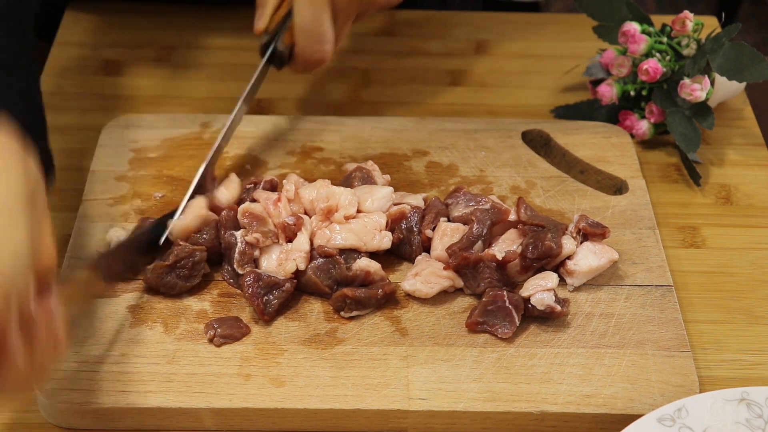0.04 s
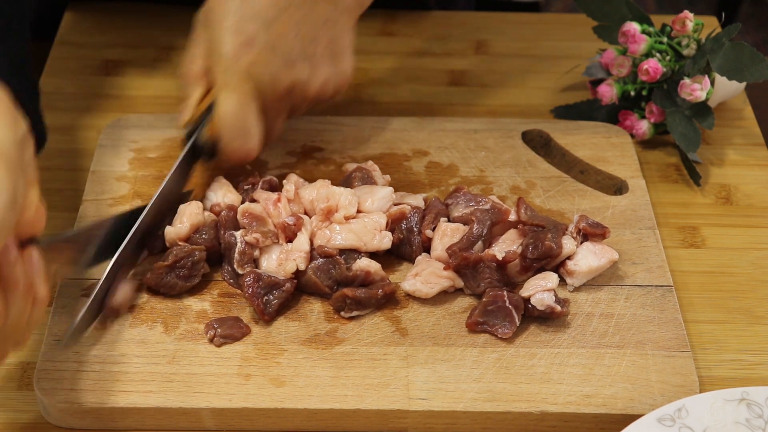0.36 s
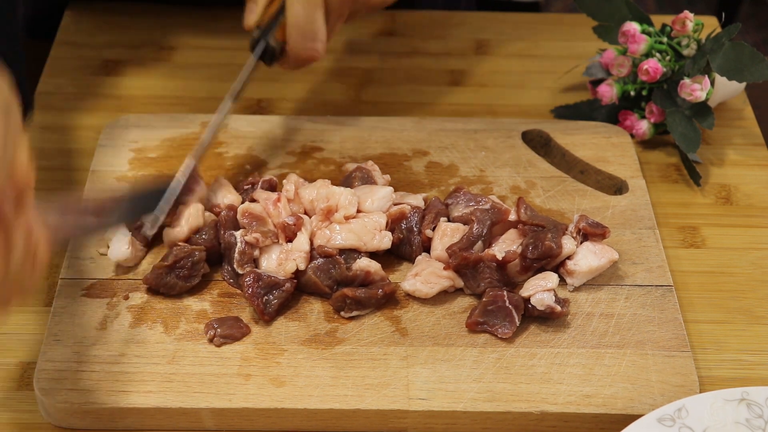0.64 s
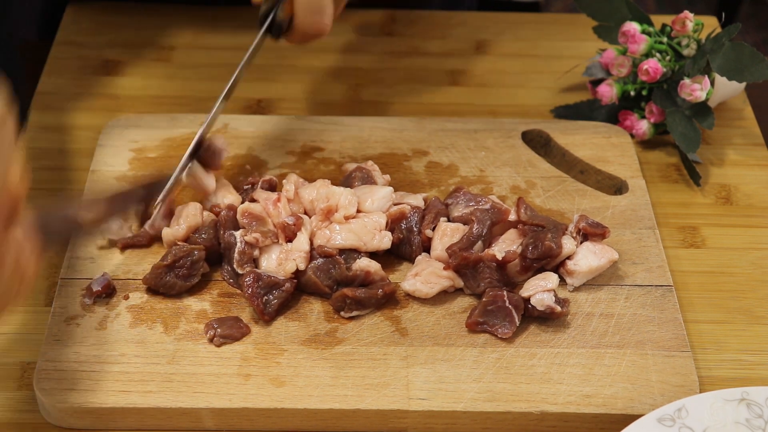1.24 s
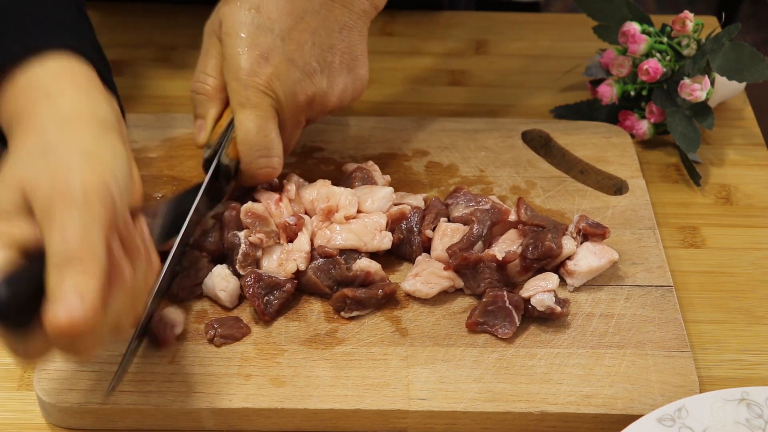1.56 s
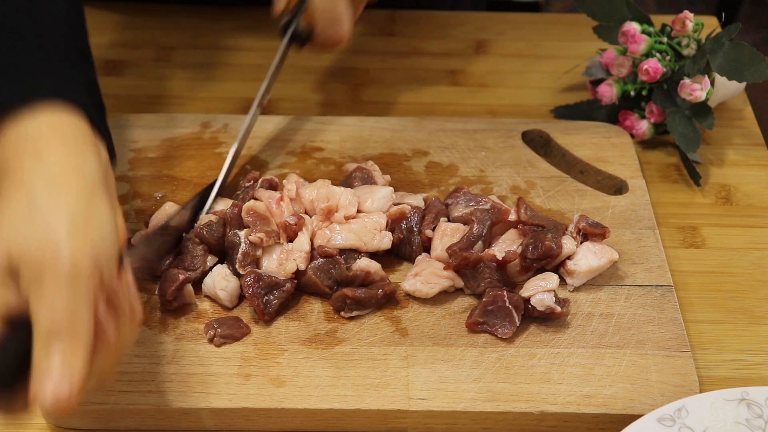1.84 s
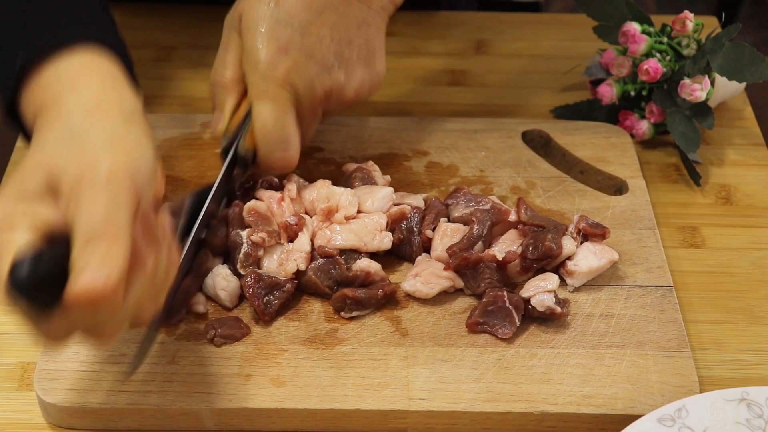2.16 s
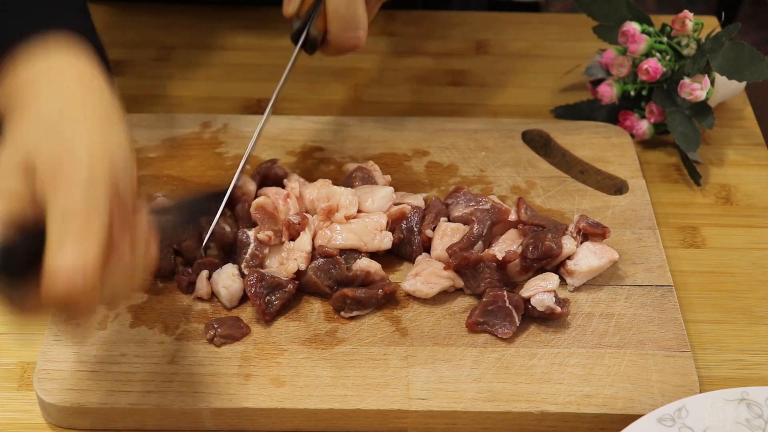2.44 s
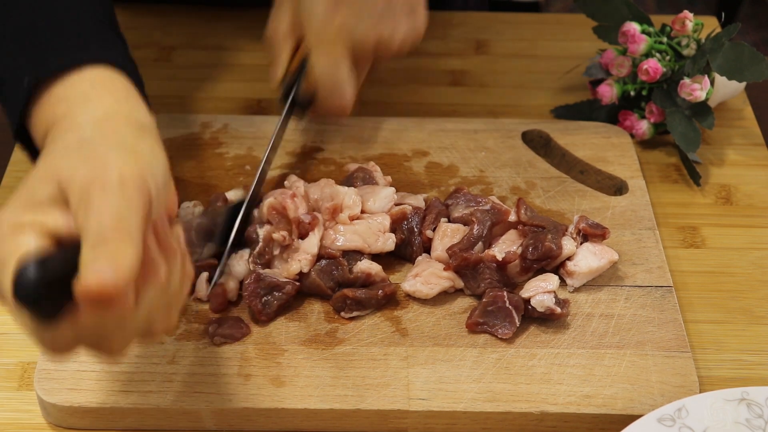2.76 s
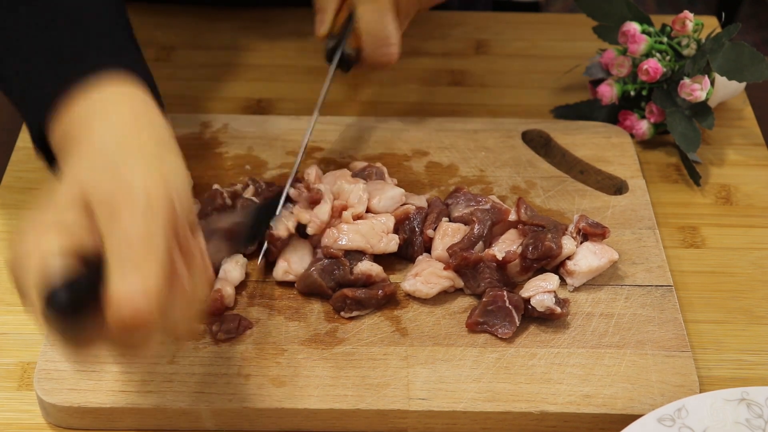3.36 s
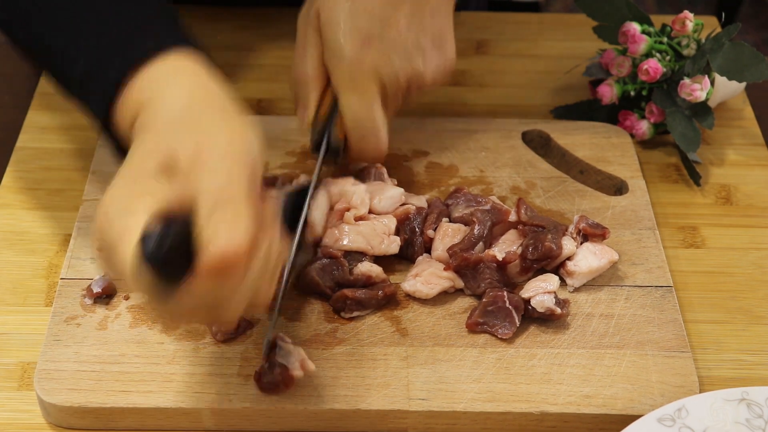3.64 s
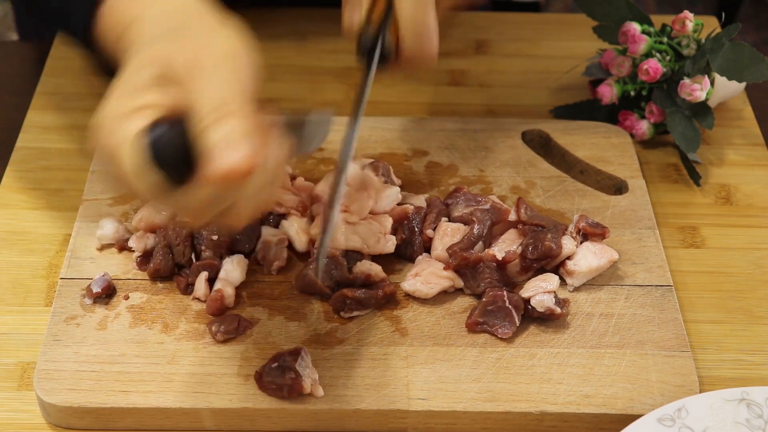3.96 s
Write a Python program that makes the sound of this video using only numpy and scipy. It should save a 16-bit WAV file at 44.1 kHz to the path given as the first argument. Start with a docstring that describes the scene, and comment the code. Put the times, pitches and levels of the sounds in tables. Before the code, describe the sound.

Knife blades scrape against each other as they slice meat, clinking and knocking on a wooden board in a steady rhythm with faint wet crackles. The last four strokes hit louder, heard up close over low kitchen room noise.

```python
"""Steel scrapes on steel over a drag on wood: two crossed knives cut meat, about twice a second.
In each stroke the blades clink together, knock on the board, then drag over it while friction between
them hisses and sings, rising in pitch. The wet meat crackles and ticks now and then. The last four
strokes land hard and overload the microphone. A small kitchen adds reverberation and steady noise."""
import sys
import numpy as np
from scipy import signal
from scipy.fft import rfft, irfft
from scipy.io import wavfile

SR = 44100
rng = np.random.default_rng(int(sys.argv[2]) if len(sys.argv) > 2 else 0)


def store_pcm(level_fs):
    """Save levels as 16-bit WAV."""
    pcm = np.round(np.clip(level_fs, -1, 1) * 32767).astype(np.int16)
    wavfile.write(sys.argv[1], SR, np.atleast_2d(pcm).T)


N = 176400
T = np.arange(N) / SR
RING_T = T[:SR // 4]
LEFT_RIGHT = np.array([[1], [-1]])
TOP_HZ = 15900

# cutting strokes (time [s], length [s], drag [dB], scrape [dB], hiss [dB], singing [dB])
CUT_STROKES = [(-.12, 0.19, -27, -29, -33.5, -32), (0.428, 0.19, -28.5, -28.5, -43.5, -29.5),
               (1.066, 0.17, -28, -25.5, -44, -28), (1.712, 0.2, -33, -29, -29.5, -30.5),
               (2.248, .17, -26, -30, -33, -31), (2.742, .175, -24.5, -29, -33, -29.5),
               (3.24, .17, -23.5, -30.5, -36.5, -30.5), (3.718, 0.15, -23.5, -27, -34, -38.5)]
# edge dragging on wood (frequency [Hz], level [dB], t60 [s])
DRAG_MODES = [(143, -27, 0.1), (254.6, -16.5, 0.057), (442.3, -4, 0.042), (540, -8.5, 0.022),
              (631, -7.5, 0.044), (825, 0, 0.038), (1044, -6, 0.042), (1367, -4.5, 0.021),
              (1744, -4.5, 0.024), (1970, -7, 0.016), (2240, -8.5, 0.075)]
# steel-on-steel scrape (frequency [Hz], level [dB])
SCRAPE_SPECTRUM = [(200, -23), (900, -3.5), (1250, -10), (1700, 0), (2500, -2), (3400, -1.5), (4000, -8.5),
                   (5500, -13), (8000, -19.5), (16000, -29)]
# sliding hiss (frequency [Hz], level [dB])
HISS_SPECTRUM = [(1000, -27), (3000, -20), (4000, 3), (6000, 3), (8300, 0.5), (10000, -4.5), (12500, -8),
                 (16000, -13)]
# steel resonances (frequency at stroke start [Hz], width [Hz], level [dB])
SING_BANDS = [(1555, 220, -5.5), (2214, 147, 2.5), (3015, 190, -7)]
# room noise (frequency [Hz], level [dB])
AIR_SPECTRUM = [(15, -49), (25, -16.5), (190, -0.5), (256, -2.5), (335, -1), (476, -2.5), (560, -3),
                (695, -5), (796, -4), (1520, -7), (1650, -9), (6560, -20), (16000, -32.5)]
# kitchen reverberation (frequency [Hz], t60 [s], level [dB])
REVERB_BANDS = [(149, 0.45, -25.5), (470, 0.4, -4), (1000, 0.62, -6), (2210, 0.47, -6.5),
                (5050, 0.72, -11.5), (12100, 0.15, -3.5)]
# blades meeting or parting (time [s], tick [dB], slide [dB], high-pass [Hz], rise [s])
BLADE_CONTACTS = [(0.161, -23, -39.5, 2840, 0.0079), (0.3268, -19, -26, 1370, 0.00056),
                  (0.339, -16, -60, 3500, 0.0018), (.737, -34, -57, 2500, 0.0051),
                  (0.8863, -23, -33, 1380, .0005), (1.5598, -19, -32.5, 1290, 0.00043),
                  (2.176, -19.5, -30.5, 1402, 0.0006), (2.7294, -18, -58, 1795, 0.00022),
                  (3.024, -21.5, -37, 3520, 0.0084), (3.2087, -13, -42, 1760, 0.00055),
                  (3.6619, -13.5, -35, 1800, 0.00043)]
# steel contact noise (frequency [Hz], level [dB])
CONTACT_SPECTRUM = [(500, -52), (1500, 9.5), (3500, -3.5), (7500, -0.5), (8600, -1.5), (10600, -1.5),
                    (13000, -9), (16000, -7)]
# blade ringing (frequency [Hz], level [dB], t60 [s])
BLADE_MODES = [(1522, 3, 0.035), (2270, 1, 0.15), (2920, -3, 0.094), (3417, 3, 0.074), (4550, 2, 0.062),
               (4980, -3, 0.12), (5740, 1, 0.036), (6260, -2, 0.12), (7660, 2, 0.065), (9360, -3.5, 0.058),
               (11500, -13, 0.043), (12210, -15, 0.044), (13600, -27, 0.037), (15140, -26, 0.039)]
# edge hitting the board (time [s], level [dB], low-pass [Hz], pitch of the spot struck [ratio])
BOARD_HITS = [(0.4068, -7.5, 1050, 0.99), (.4445, -3.5, 644, 0.77), (1.0292, -5.5, 650, 1.096),
              (1.0750, -8.5, 589.5, 0.9), (1.714, -21, 706, 0.78), (2.239, -1, 4830, 1.007),
              (2.7324, -2.5, 1870, 1.19), (2.7334, 5.5, 2140, 1.004), (3.2335, -21, 1845, 0.98),
              (3.2356, 4.5, 2450, 1), (3.7003, 1, 4000, 1.08), (3.7095, -6.5, 1690, 0.87)]
# board ringing (frequency [Hz], level [dB], t60 [s])
BOARD_MODES = [(166, -30, 0.037), (272, -20.5, 0.07), (496, -13, .04), (611, -12.5, 0.014),
               (807, -1.5, 0.035), (879, 3.5, 0.02), (1049, 2.5, 0.016), (1315, -5.5, 0.026),
               (1720, 4, 0.017), (2066, 5.5, 0.013), (2370, -4.5, 0.018), (3395, -1.5, 0.023),
               (3860, -14.5, 0.012), (5300, -30, 0.0048)]
# wet ticks of the meat (time [s], level [dB], frequency [Hz])
MEAT_TICKS = [(1.681, -21, 3400), (3.274, -37, 9500), (3.2953, -9, 9560), (3.502, -25, 7407),
              (3.976, -28, 6810)]


def amp(db):
    """Decibels to gain."""
    return 10 ** (np.asarray(db) / 20)


def unit(x):
    """Scale to rms 1."""
    return x / np.sqrt(np.mean(x ** 2))


def noise(shape=N):
    """White noise."""
    return rng.standard_normal(shape)


def add(out, start_s, x):
    """Mix x in at a time."""
    i = int(start_s * SR)
    out[i:i + len(x)] += x[:N - i]


def colour(x, spectrum):
    """Shape noise to a spectrum, at rms 1."""
    size = x.shape[-1]
    hz, db = np.array(spectrum, float).T
    bin_db = np.interp(np.log(np.fft.rfftfreq(size, 1 / SR) + 1), np.log(hz), db)
    return unit(irfft(rfft(x) * amp(bin_db), size))


def filt(x, hz, kind, order=2):
    """Low-, high- or band-pass."""
    edges_hz = np.clip(hz, 10, SR / 2 - 100)
    return signal.sosfilt(signal.butter(order, edges_hz, kind, fs=SR, output="sos"), x)


def ring(modes, pitch=1, detune=0):
    """Decaying modes of alternating sign, optionally detuned at random."""
    out = 0
    for k, (hz, db, t60_s) in enumerate(modes):
        tuned_hz = hz * pitch * (1 + detune * rng.standard_normal())
        out += (-1) ** k * amp(db - 60 * RING_T / t60_s) * np.sin(2 * np.pi * tuned_hz * RING_T)
    return out


def drive(force, response):
    """Pass a force through a body's unit-energy response."""
    return signal.fftconvolve(force, response / np.linalg.norm(response))[:len(force)]


def press(age_s, length_s, attack_s, release_s):
    """Linear attack, hold, exponential release."""
    return np.clip(age_s / attack_s, 0, 1) * np.exp(-np.maximum(age_s - length_s, 0) / release_s)


def friction(slips_per_s=5000, judder_db=1, judder_hz=40):
    """Dense tiny slips of uneven size under a juddering hand."""
    slips = (rng.random(N) < slips_per_s / SR) * noise()
    judder = unit(filt(noise(), judder_hz, "low"))
    return unit(slips * amp(judder_db * judder))


def strokes(attack_s=0.0049, release_s=0.032, sag_db_per_s=37, pitch_rise_per_s=1.25):
    """Edges drag over wood while the blades scrape along each other, hissing most at full speed."""
    drag_env, scrape_env, hiss_env, sing_env = np.zeros((4, N))
    pitch = np.ones(N)
    for start_s, length_s, drag_db, scrape_db, hiss_db, sing_db in CUT_STROKES:
        age_s = np.clip(T - start_s, 0, 1)
        speed = 1 / (1 + ((age_s / length_s - 0.69) / 0.31) ** 2)  # peaks 69% through the stroke
        drag_env += amp(drag_db - sag_db_per_s * age_s) * press(age_s, length_s, attack_s, 0.041)
        scrape_env += amp(scrape_db) * press(age_s, length_s, 0.078, release_s)
        hiss_env += amp(hiss_db) * press(age_s, length_s, attack_s, release_s) * speed
        sing_env += amp(sing_db) * press(age_s, length_s, 0.18, release_s)
        pitch = np.where(age_s > 0, 1 + pitch_rise_per_s * np.minimum(age_s, length_s), pitch)
    drag = drive(drag_env * friction(), ring(DRAG_MODES))
    scrape = scrape_env * colour(friction(), SCRAPE_SPECTRUM)
    wet_hiss = hiss_env * (colour(friction(), HISS_SPECTRUM) + crackle())
    return drag + scrape + wet_hiss + sing_env * singing(pitch)


def crackle(grains_per_s=500, scatter_db=6):
    """Wet fibres part under the edge in sparse, uneven grains."""
    grains = (rng.random(N) < grains_per_s / SR) * rng.choice([-1, 1], N)
    sizes = amp(scatter_db * np.minimum(rng.exponential(size=N), 3))
    return amp(-16.5) * unit(filt(grains * sizes, [2000, 6000], "band"))


def singing(pitch, wander_share=0.022, wander_hz=18):
    """Friction shakes narrow steel resonances; they glide as the crossing point runs along the blades."""
    out = 0
    for hz, width_hz, db in SING_BANDS:
        wander = 1 + wander_share * unit(filt(noise(), wander_hz, "low"))
        phase = 2 * np.pi * np.cumsum(hz * pitch * wander) / SR
        in_phase, quadrature = (unit(filt(friction(), width_hz / 2, "low")) for _ in range(2))
        out += amp(db) * (in_phase * np.cos(phase) + quadrature * np.sin(phase))
    return unit(out)


def air(mid_db=-46):
    """Steady room noise, more alike left and right in the bass."""
    mid, side = colour(noise((2, N)), AIR_SPECTRUM)
    side = 0.32 * side + 0.65 * filt(side, 1500, "high", order=1)
    return amp(mid_db) * (mid + side * LEFT_RIGHT)


def kitchen(x, delay_s=0.0048, apart_hz=730):
    """Diffuse reflections decaying by octave band; left and right differ above apart_hz."""
    age_s = T[:SR]
    hz, t60s, levels = np.array(REVERB_BANDS).T
    response = 0
    for centre_hz in 125 * 2. ** np.arange(8):
        t60_s, db = (np.interp(np.log(centre_hz), np.log(hz), column) for column in (t60s, levels))
        mid, side = filt(noise((2, SR)), [centre_hz / np.sqrt(2), centre_hz * np.sqrt(2)], "band", 3)
        width = centre_hz / np.hypot(centre_hz, apart_hz)
        band = (mid + width * side * LEFT_RIGHT) / np.hypot(1, width)
        fade = (age_s > delay_s) * amp(-60 * age_s / t60_s)
        response += amp(db) * band * fade / np.linalg.norm(fade)
    return signal.fftconvolve(x[None], response, axes=1)[:, :N]


def clinks(ring_db=-3, rub_db=-6.5):
    """Steel chatters on steel for a moment, then slides lightly; both blades ring."""
    out, age_s = np.zeros(N), T[:SR // 2]
    for start_s, tick_db, slide_db, low_hz, rise_s in BLADE_CONTACTS:
        tick_env = amp(tick_db) * press(age_s, rise_s, rise_s, release_s=0.0038)
        slide_env = amp(slide_db) * press(age_s, rise_s, rise_s, release_s=0.08)
        tick = tick_env * colour(noise(len(age_s)), CONTACT_SPECTRUM)
        slide = slide_env * noise(len(age_s))
        rub = amp(rub_db) * slide_env * colour(noise(len(age_s)), CONTACT_SPECTRUM)
        blades = sum(ring(BLADE_MODES, detune=0.0218) for _ in range(8))
        ringing = amp(ring_db) * drive(tick / 2 + slide, blades)
        add(out, start_s, filt(tick + ringing + rub, low_hz, "high", order=3))
    return out


def knocks(crack_s=0.0019, thump_s=0.011):
    """The edge hits the board; meat under it softens the blow."""
    out = np.zeros(N)
    thump = amp(-43.5) * np.exp(-RING_T / thump_s)
    for start_s, db, bright_hz, pitch in BOARD_HITS:
        burst = filt(noise(len(RING_T)), [600, 6000], "band", order=1)
        crack = amp(5.5) * burst * np.exp(-RING_T / crack_s)
        wood = filt(ring(BOARD_MODES, pitch) / 2 + crack, 258, "high", order=1)  # bass radiates poorly
        add(out, start_s, amp(db) * filt(wood + thump, bright_hz, "low"))
    return out


def squelches(decay_s=0.0008):
    """Tiny wet snaps as meat lets go of the steel."""
    out = np.zeros(N)
    for start_s, db, hz in MEAT_TICKS:
        burst = unit(filt(noise(len(RING_T)), [hz / 1.35, hz * 1.18], "band", order=4))
        add(out, start_s, amp(db) * burst * np.exp(-RING_T / decay_s))
    return out


def scene(lag_s=32e-6, top_pan_db=1, side_db=-5.5):
    """The knives reach the left microphone a moment earlier and a little brighter."""
    direct = knocks() + clinks() + strokes() + squelches()
    # long blades radiate their treble unevenly to left and right
    side = amp(side_db) * filt(clinks() + strokes(), 1980, "high", order=1)
    hz, spectrum = np.fft.rfftfreq(N, 1 / SR), rfft(direct)
    pan_db = top_pan_db * hz / TOP_HZ
    left = irfft(spectrum * amp(pan_db), N)
    right = irfft(spectrum * amp(-pan_db) * np.exp(-2j * np.pi * hz * lag_s), N)
    return np.array([left, right]) + side * LEFT_RIGHT + kitchen(direct) + air()


def record(dry):
    """The hardest knocks clip; a steep low-pass follows."""
    return signal.sosfilt(signal.ellip(8, .2, 70, TOP_HZ, fs=SR, output="sos"), np.clip(dry, -1, 1))


dry = scene()
out = record(dry)
store_pcm(out)
```